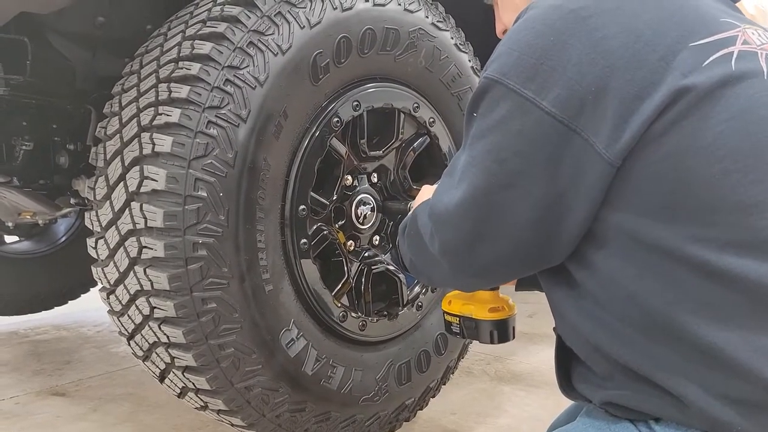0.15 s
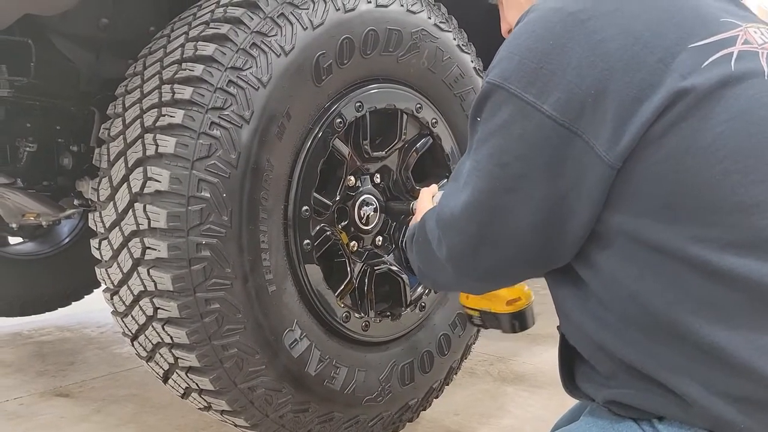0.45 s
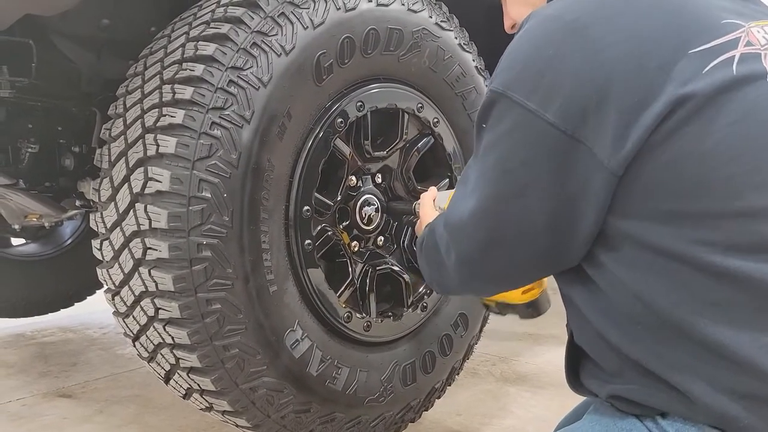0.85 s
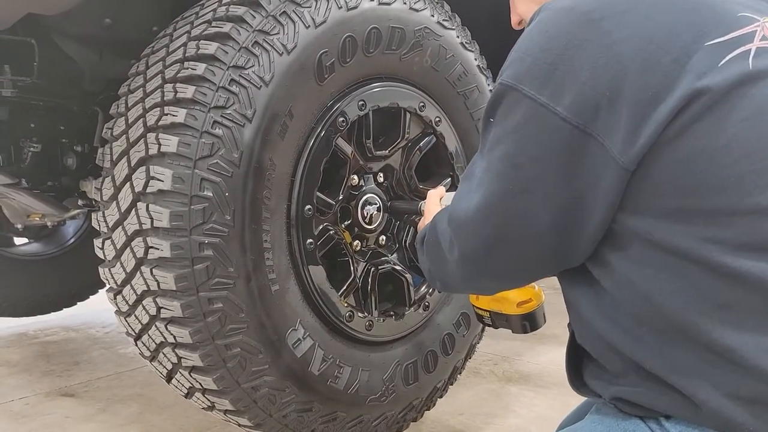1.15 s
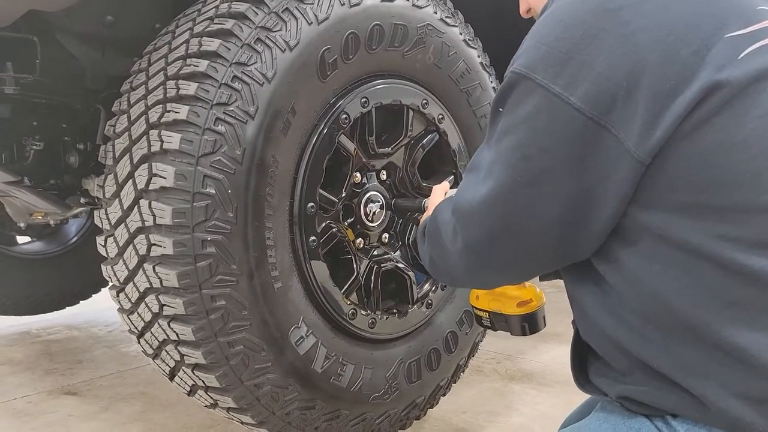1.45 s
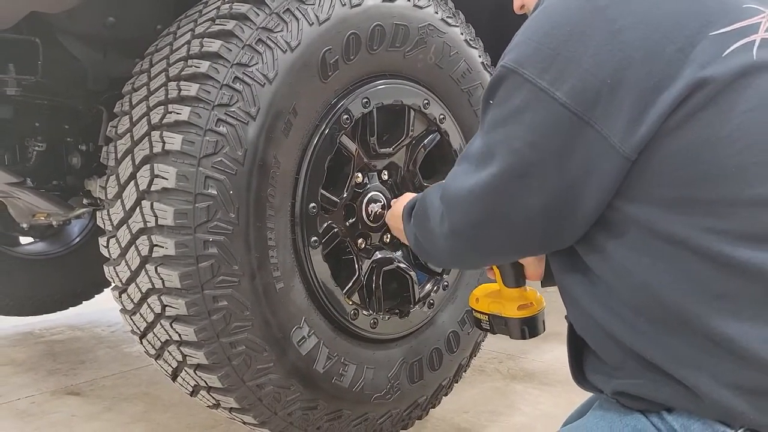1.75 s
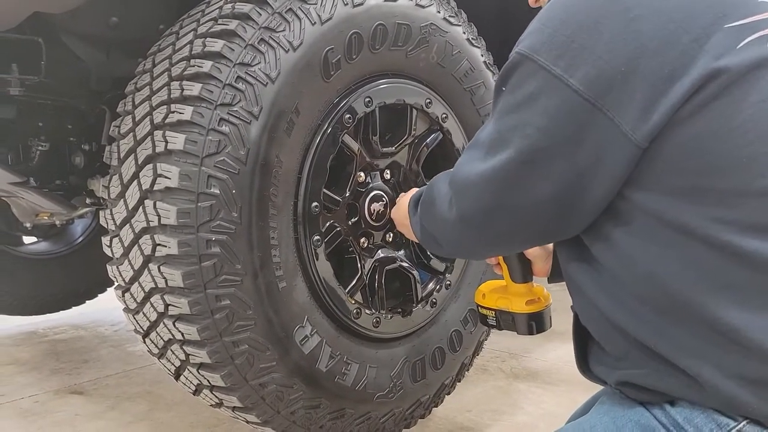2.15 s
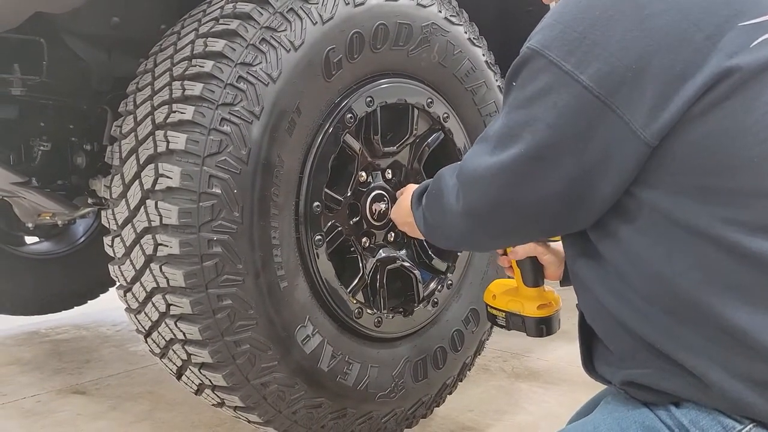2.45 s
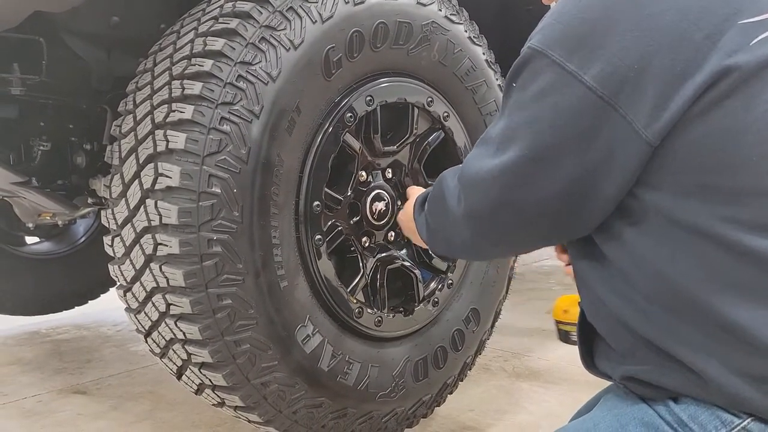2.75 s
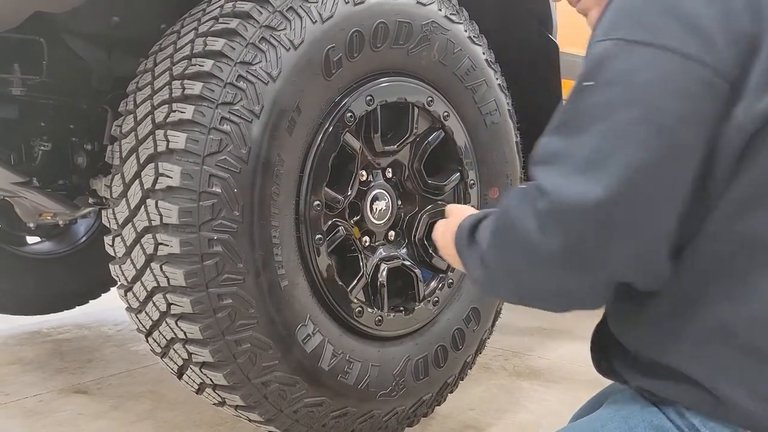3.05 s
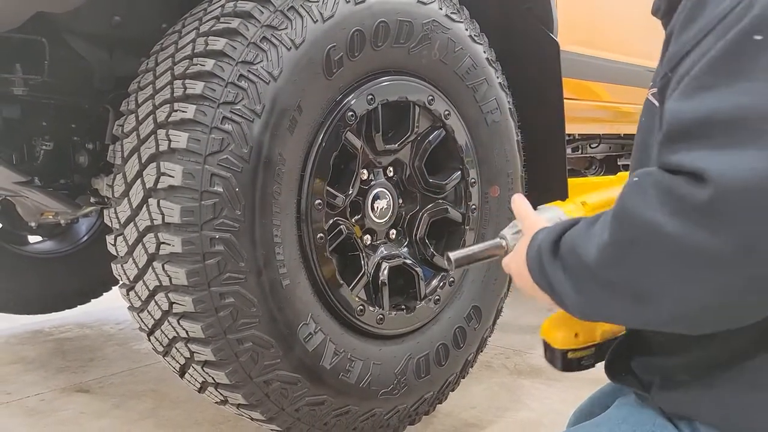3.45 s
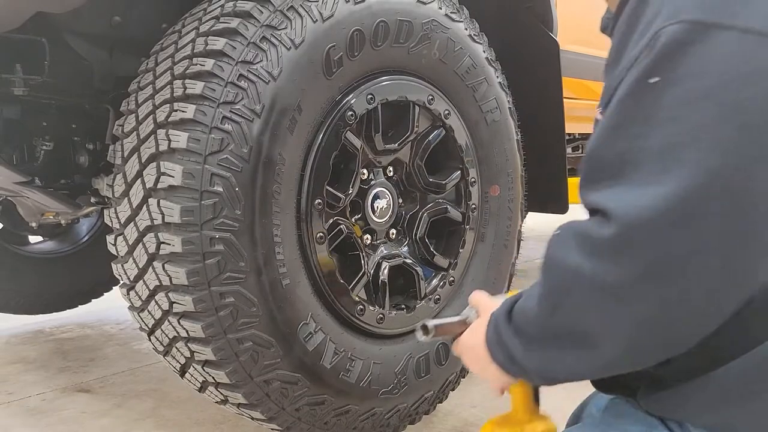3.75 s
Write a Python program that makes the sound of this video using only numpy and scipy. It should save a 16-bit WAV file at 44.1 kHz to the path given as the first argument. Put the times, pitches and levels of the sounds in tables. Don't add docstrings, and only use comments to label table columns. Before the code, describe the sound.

A loud rattling impact wrench cuts off, leaving garage echo, light ticks and a small metal clank.

```python
import sys
import numpy as np
from scipy import signal
from scipy.fft import rfft, irfft
from scipy.io import wavfile

SR = 44100
rng = np.random.default_rng(int(sys.argv[2]) if len(sys.argv) > 2 else 0)


def linear_from_db(decibels):
    return 10 ** (np.asarray(decibels, float) / 20)


def digitize_waveform(pressure):
    field = np.atleast_2d(pressure).T
    bounded = np.clip(field, -1, 1)
    quanta = np.round(bounded * 32767).astype(np.int16)
    wavfile.write(sys.argv[1], SR, quanta)


N = 171990
RUN_IN_S = 1.0
LEAD = int(RUN_IN_S * SR)
M = N + LEAD


def rms_one(x):
    return x / np.sqrt(np.mean(x ** 2) + 1e-20)


def at_hz(points, hz):
    points = np.array(points)
    return np.interp(np.log(hz), np.log(points[:, 0]), points[:, 1])


def in_time(rows):
    return np.interp(np.arange(N) / SR, *np.transpose(rows))


def colour(x, points):
    size = 4096
    hz = np.arange(1, size // 2 + 2) * SR / size
    cepstrum = irfft(np.log(linear_from_db(at_hz(points, hz))))
    cepstrum[1:size // 2] *= 2
    taps = irfft(np.exp(rfft(cepstrum[:size // 2], size)))[:size // 2]
    return signal.oaconvolve(x, taps[None], axes=1)[:, :x.shape[1]]


def band(x, low_hz, high_hz):
    return signal.sosfilt(signal.butter(2, [low_hz, high_hz], "band", fs=SR, output="sos"), x)


def clicks(s, gains):
    out = np.zeros(M)
    np.add.at(out, (np.asarray(s) * SR).astype(int) + LEAD, gains)
    return out


def ring(x, hz, t60):
    r = linear_from_db(-60 / (max(t60, .003) * SR))
    w = 2 * np.pi * min(hz, .45 * SR) / SR
    return signal.lfilter([0, np.sin(w)], [1, -2 * r * np.cos(w), r * r], x + 1e-18)


def puffs(s, db, t60):
    envelope = signal.lfilter([1], [1, -linear_from_db(-60 / (t60 * SR))], clicks(s, linear_from_db(db)) + 1e-18)
    return envelope * rng.standard_normal(M)


def space(x, t60_of, size):
    t = np.arange(size) / SR
    bounds_hz = 40 * 2 ** np.arange(0, 9.1, .5)
    white, tail = rng.standard_normal((2, 2, size)), 0
    for k, (low, high) in enumerate(zip(bounds_hz, bounds_hz[1:])):
        t60 = t60_of(np.sqrt(low * high))
        tail = tail + band(white[k % 2], low, high) * linear_from_db(-60 * t / t60) / np.sqrt(t60)
    tail = tail / np.sqrt(np.sum(tail ** 2) / 2)
    return signal.fftconvolve(x[None], tail, axes=1)[:, :M]


def hall(x):
    # pitch_hz, t60_s
    hall_t60 = [(60, 1.91), (300, 1.5), (1000, 2), (3000, 1.8349), (7000, 1.73), (9000, 0.89), (13000, 1.0),
                (16000, 0.97)]
    # pitch_hz, level_db
    hall_colour = [(60, -0.5), (300, 3.5), (1000, 1.5), (2000, 3), (4000, -2), (7500, -5), (9000, -7),
                   (16000, -14.5)]
    tail = space(x, lambda hz: at_hz(hall_t60, hz), size=2 * SR)
    return colour(tail, hall_colour)


def quiet():
    # pitch_hz, level_db_per_hz
    room_tone = [(25, -33), (70, -7), (115, -8), (160, -24), (270, -27), (420, -21), (7300, -28),
                 (8300, -45)]
    air = linear_from_db(-69.5) * rms_one(colour(rng.standard_normal((2, N)), room_tone))
    return air + linear_from_db(-86) * np.sin(2 * np.pi * 463 * np.arange(N) / SR)


def stir(rows, low_hz, high_hz):
    one, two = rng.standard_normal((2, N))
    ports = np.array([one + 0.31 * two, one - 1.4 * two])
    rubbed = band(band(ports, low_hz, high_hz), low_hz, high_hz)
    return linear_from_db(in_time(rows)) * rms_one(rubbed)


def rubbing():
    # time_s, level_db
    scuff = [(1.0, -73), (1.15, -48.5), (1.33, -57.5), (1.36, -39.5), (1.45, -48), (1.55, -53), (1.66, -71),
             (1.9, -76), (2.0, -69), (2.12, -110)]
    # time_s, level_db
    rustle = [(3.32, -110), (3.37, -76), (3.5, -79), (3.55, -110)]
    # time_s, level_db
    glove = [(1.72, -91), (1.8, -69), (1.88, -61), (1.95, -68), (2.08, -68), (2.3, -110)]
    # time_s, level_db
    slide = [(1.1, -85), (1.3, -55), (1.55, -60.5), (1.9, -74), (2.1, -110)]
    soft = stir(scuff, 117, 237.5) + stir(glove, 300, 437)
    return soft + stir(rustle, 10000, 14000) + stir(slide, 9000, 15900)


def knocks_and_chinks():
    # start_s, level_db, pitch_hz, t60_s, left_minus_right_db
    knocks = [(1.362, -28.5, 746, .02, 2), (1.397, -35, 795, 0.027, 2), (1.452, -33, 883, 0.018, 2),
              (1.495, -40, 1610, 0.054, 0), (1.53, -38.5, 1520, .05, -1), (1.54, -36, 760, 0.018, 5),
              (1.69, -50, 577, 0.026, 0), (1.81, -45, 782, 0.032, 2), (1.965, -48, 188, 0.048, -2),
              (2.03, -47.5, 825, .02, 8), (3.234, -48, 1220, 0.008, 2), (3.291, -57, 764, 0.011, 11.5),
              (3.445, -51.5, 840, 0.018, 5.5), (3.591, -40.5, 800, 0.017, 4), (3.593, -45, 1440, 0.0094, 6),
              (3.654, -55, 1120, 0.046, 7)]
    # start_s, level_db, pitch_hz, t60_s, left_minus_right_db
    chinks = [
        (3.118, -53, 2594, 0.036, 6),
        (3.127, -49, 2630, 0.033, 13),
        (3.134, -38.5, 2584, 0.03, 9),
        (3.139, -61, 2785, 0.81, -1),
    ]
    out = np.zeros((2, M))
    for rows, click_db in ((knocks, 5), (chinks, -20)):
        for s, db, hz, t60, pan_db in rows:
            body = band(ring(clicks([s], linear_from_db(db)), hz, t60), 0.92 * hz, 1.36 * hz)
            touch = band(clicks([s], linear_from_db(db + click_db)), 0.89 * hz, 3.5 * hz)
            out = out + (body + touch) * linear_from_db(np.array([[.5], [-.5]]) * pan_db)
    return out


def extension_bar():
    start_s, gripped_s, pitch_hz, beat_hz, t60_s = 2.648, 3.0, 4257, 6.9, 1.35
    song = ring(clicks([start_s], linear_from_db(-65)), pitch_hz, t60_s)
    song = song + ring(clicks([start_s], linear_from_db(-65.5)), pitch_hz + beat_hz, t60_s)
    song = song * np.clip((gripped_s + RUN_IN_S - np.arange(M) / SR) / .02, 0, 1)
    return song + band(clicks([start_s], linear_from_db(-38)), 5000, 8500)


def socket_ticks():
    # start_s, peak_db, ping_hz, ping_t60_s, ping_db
    ticks = [(1.362, -24, 13850, 0.0091, -47), (1.475, -43, 12500, .01, -42), (1.515, -48, 15200, .02, -39),
             (1.59, -40, 13000, .01, -55), (1.926, -50, 14610, 0.032, -57.5),
             (1.959, -32, 12740, 0.0092, -59), (2.330, -41.5, 14680, 0.28, -57),
             (2.584, -54, 3640, .02, -64), (2.648, -41, 4265, 0.076, -45.5), (3.014, -59, 12900, .008, -59),
             (3.19, -64, 4290, .01, -60), (3.276, -44, 3400, .012, -48), (3.534, -48.5, 4770, 0.013, -53.5),
             (3.64, -62, 3950, .02, -66), (3.003, -55, 4520, 0.017, -70)]
    t60_s, low_hz, high_hz, socket_free_s = 0.024, 2000, 6500, 2.1
    s, db = np.transpose(ticks)[:2]
    cracks = band(puffs(s, db, t60_s), low_hz, high_hz)
    cracks = band(cracks, 0.62 * low_hz, 1.12 * high_hz)
    bright = s < socket_free_s
    cracks = cracks + band(puffs(s[bright], db[bright] - 11, t60_s / 2), 8600, 15500)
    pings = sum(ring(clicks([start], linear_from_db(ping_db)), hz, t60) for start, _, hz, t60, ping_db in ticks)
    return cracks, pings


def socket_clank():
    # start_s, level_db
    bounces = [
        (3.015, -32),
        (3.02, -56),
        (3.04, -43),
        (3.048, -48),
        (3.058, -56),
        (3.064, -52.5),
    ]
    # pitch_hz, level_db, t60_s
    modes = [(1876, -5.5, 0.024), (2580, -4.5, 0.017), (3330, -8.5, 0.0044), (4304, 2.5, 0.0093),
             (4770, 3.5, 0.019), (5533, -1.5, 0.017), (6100, -22, 0.0069), (7400, -28, 0.0078)]
    wall_delay_s = .021
    s, db = np.transpose(bounces)
    steep = signal.butter(5, [1660, 6500], "band", fs=SR, output="sos")
    clank = puffs(s, db + 6, 0.011)
    for k, (hz, level_db, t60) in enumerate(modes):
        luck = rng.standard_normal(len(s))
        hits = clicks(s, linear_from_db(db + level_db + 2.0 * luck))
        clank = clank + (-1) ** k * ring(hits, hz, t60)
    wash = band(clicks(s[:1] + wall_delay_s, linear_from_db(db[0] + 25.5)), 2140, 6800)
    return signal.sosfilt(steep, clank), signal.sosfilt(steep, wash)


def handling():
    cracks, pings = socket_ticks()
    clank, wash = socket_clank()
    rings = pings + knocks_and_chinks()
    direct = cracks + rings + extension_bar() + clank
    return direct, cracks + wash + linear_from_db(-6) * rings.mean(0)


def hammer_blows():
    # start_s, peak_db, wheel_ring_db, socket_body_db, anvil_ring_db
    blows = [(0.0151, -3.5, -18, -14, -20), (0.0426, -7, -16, -10, -19), (0.0688, -3.5, -18, -14.5, -19),
             (0.0966, -4.5, -21.5, -13.5, -18.5), (0.1238, -4.5, -29, -14.5, -17.5),
             (0.1509, -2, -21, -22, -14), (0.177, -3.5, -18.5, -16, -17.5),
             (0.2052, -2.5, -16.5, -13, -19.5), (0.2314, -6, -25, -13.5, -17.5),
             (0.2585, -6, -20.5, -16, -17), (0.286, -5.5, -16.5, -21, -14.5),
             (0.3126, -3, -27.5, -22, -16.5), (0.3399, -6.5, -21, -14, -15),
             (0.3665, -3.5, -19.5, -16.5, -15.5), (0.3931, -6.5, -15.5, -18.5, -13.5),
             (0.4191, -3.5, -21.5, -16.5, -15), (0.4462, -6, -20, -18, -16), (0.4735, -3, -20, -16.5, -14),
             (0.5002, -5.5, -18.5, -17, -16.5), (0.5266, -2, -18.5, -16.5, -18),
             (0.5539, -6.5, -16.5, -19.5, -15.5), (0.5787, -3, -24, -20, -17),
             (0.6059, -4.5, -21.5, -18, -15.5), (0.6321, -4.5, -25, -20, -16),
             (0.6586, -3.5, -22.5, -17.5, -15), (0.6846, -4.5, -20.5, -17.5, -15),
             (0.7104, -3.5, -23, -20.5, -13.5), (0.7371, -6, -20, -16.5, -17),
             (0.7624, -6, -19.5, -14.5, -15.5), (0.788, -5.5, -22, -13.5, -13.5),
             (0.817, -8, -17.5, -17.5, -15.5), (0.8417, -4.5, -18, -20, -16.5),
             (0.8708, -6.5, -13.5, -16.5, -17), (0.8977, -3.5, -18.5, -15, -20.5)]
    seating_hz = [1100, 1600, 2200, 3200, 4600, 6500]
    period_s, run_in_db, seating_share, lead_s = .027, -5.5, 1.1, .0001
    usual = np.mean(blows, axis=0)
    before = [(blows[0][0] - period_s * k, run_in_db, *usual[2:]) for k in range(36, 0, -1)]
    around_usual = np.transpose(before + list(blows)) - (usual * [0, 0, 1, 1, 1])[:, None]
    s, db, wheel_db, body_db, anvil_db = around_usual
    none = 0 * s
    seats = seating_share * np.transpose([none, wheel_db, none, body_db, anvil_db, none])

    def seat_db(hz):
        return np.array([np.interp(hz, seating_hz, row) for row in seats])

    return s - lead_s, db, seat_db


def blow_rattle(s, db, seat_db):
    # pitch_hz, level_db_per_hz
    blow_colour = [(40, -12.5), (180, -7.5), (500, -10.5), (750, -8), (2000, -8.5), (3200, -3.5),
                   (6000, -2), (16000, -5.5)]
    attack_s, hold_s, t60_s, t60_tilt = 0.0017, 0.0017, 0.022, -.2
    grit_db, luck_db = 2.5, 1.2
    bounds_hz = [30, 60, 120, 250, 500, 900, 1300, 1900, 2600, 3900, 5200, 8000, 11000, 19000]
    span = LEAD + SR
    t = np.arange(2000) / SR
    attack = np.clip(t / attack_s, 0, 1) ** 2
    grit = np.repeat(rng.standard_normal(span // 10), 10)
    white = rms_one(rng.standard_normal((2, 2, span)) * linear_from_db(grit_db * grit))
    burst = 0
    for k, (low, high) in enumerate(zip(bounds_hz, bounds_hz[1:])):
        t60 = t60_s * (max(low, 500) / 3000) ** t60_tilt
        shape = attack * linear_from_db(-60 * np.maximum(t - hold_s, 0) / t60)
        luck = rng.standard_normal(len(s))
        hits = clicks(s, linear_from_db(db + seat_db(np.sqrt(low * high)) + luck_db * luck))[:span]
        envelope = signal.oaconvolve(hits, shape)[:span]
        burst = burst + band(white[k % 2] * envelope, low, high)
    return np.pad(linear_from_db(-0.5) * colour(burst, blow_colour), ((0, 0), (0, M - span)))


def wheel_ring(s, db, seat_db):
    # pitch_hz, level_db, t60_s
    modes = [(730.4, -33.5, 0.044), (999, -42.5, 0.13), (1579, -28.5, 0.033), (3497, -24, 0.012),
             (4414, -32, 0.027), (5980, -28.5, 0.03), (8060, -31.5, 0.02), (12200, -33, .012)]
    delay_s, out = .0012, 0
    for hz, level_db, t60 in modes:
        luck, sign = rng.standard_normal((2, len(s)))
        gains = linear_from_db(db + level_db + 10.5 + seat_db(hz) + 1.5 * luck) * np.sign(sign)
        out = out + ring(clicks(s + delay_s, gains), hz, t60)
    return out


def tyre_boom(s, db):
    # pitch_hz, level_db, t60_s
    modes = [(74, -57, 1.25), (66.02, -56, 0.39), (114, -56.5, 0.25), (139.1, -55.5, 0.14),
             (222.1, -49.5, .4), (295.5, -52, .25), (370, -57.5, 0.43)]
    push = clicks(s, linear_from_db(db + 11))
    return sum(linear_from_db(level_db) * ring(push, hz, t60) for hz, level_db, t60 in modes)


def wrench():
    s, db, seat_db = hammer_blows()
    rattle, side = blow_rattle(s, db, seat_db)
    wheel = wheel_ring(s, db, seat_db)
    tyre = tyre_boom(s, db)
    mid = rattle + wheel + tyre
    side = linear_from_db(-0.5) * side + linear_from_db(-11) * np.roll(tyre, 150)
    return rattle + linear_from_db(-13.5) * wheel, np.array([mid + side, mid - side])


def microphone(x):
    # pitch_hz, level_db
    capsule = [(40, 0.9), (1000, -1.56), (7300, 0.18), (8300, -7), (10500, -13), (12000, -3.5),
               (15600, -5.5)]
    return colour(x, capsule)


def scene():
    # time_s, level_db
    gain = [(0, 1.28), (.9, 0.23), (1.2, 2.5), (1.5, 10), (1.9, 14), (2.15, 12), (2.4, 12.5), (3.9, 35)]
    # pitch_hz, level_db
    left_port = [(40, 2), (250, 1), (500, 2), (1000, 2), (2500, 0.2), (6000, 0.1), (9000, 2.5), (16000, 7)]
    direct, spread = handling()
    near = linear_from_db(-3) * space(spread, lambda hz: .12, size=6000)
    hands = (direct + near + linear_from_db(-1) * hall(spread))[:, LEAD:]
    blows, tool = wrench()
    early = linear_from_db(-7.5) * space(blows, lambda hz: .3, size=12000)
    tool = (tool + linear_from_db(-1.2) * hall(blows) + early)[:, LEAD:]
    heard = microphone(tool * linear_from_db(in_time(gain)) + hands + rubbing()) + quiet()
    return linear_from_db(-1.14) * np.vstack([colour(heard[:1], left_port), heard[1:]])


def roll_off(x):
    return signal.sosfilt(signal.butter(12, 16990, fs=SR, output="sos"), x)


def record(dry):
    cut = signal.sosfilt(signal.cheby2(12, 60, 16400, fs=SR, output="sos"), dry)
    mix = 1.225 * np.tanh(cut / 1.015)
    return roll_off(mix)


dry = scene()
out = record(dry)
digitize_waveform(out)
```